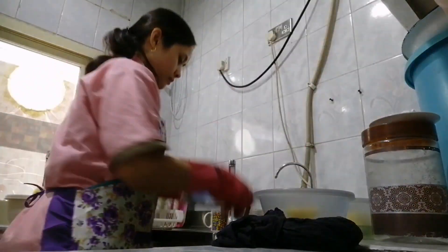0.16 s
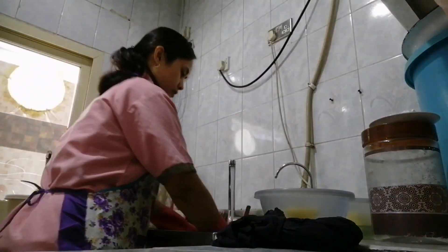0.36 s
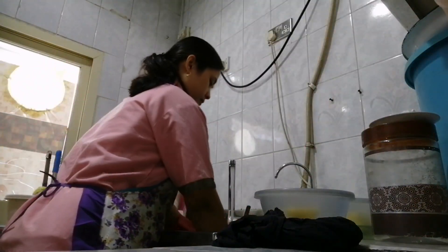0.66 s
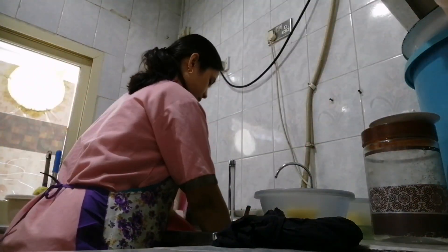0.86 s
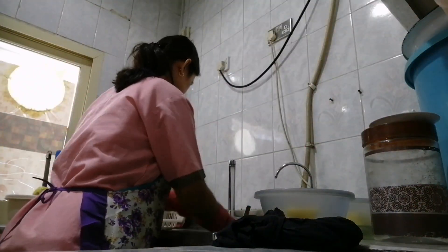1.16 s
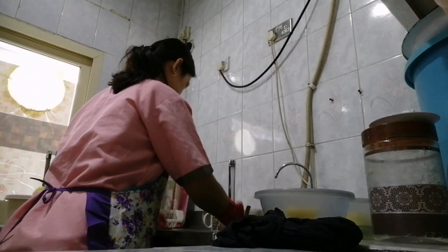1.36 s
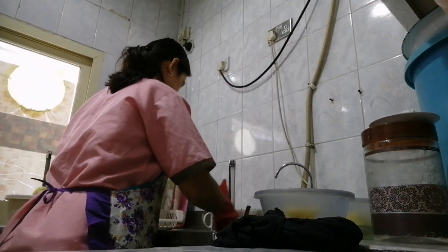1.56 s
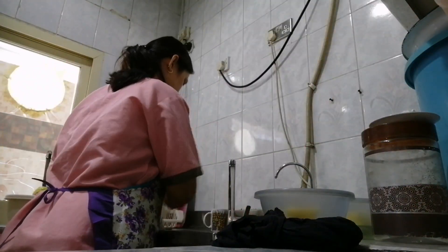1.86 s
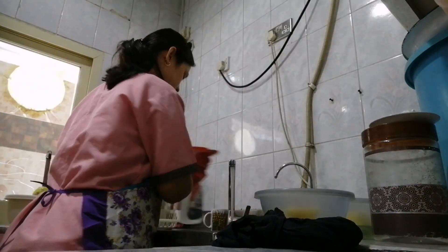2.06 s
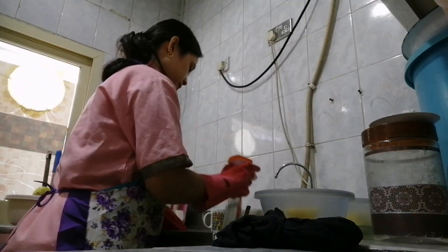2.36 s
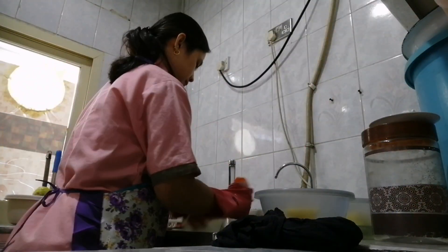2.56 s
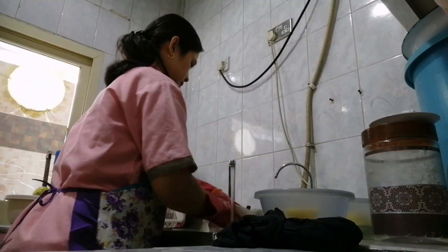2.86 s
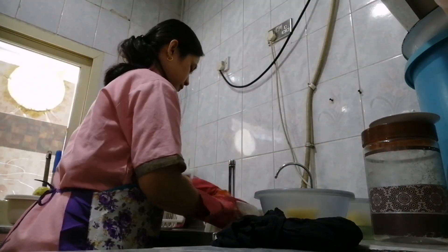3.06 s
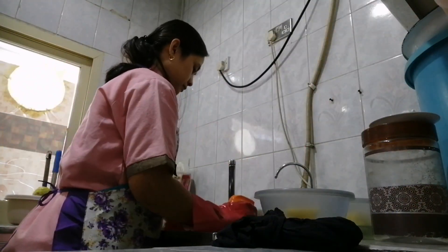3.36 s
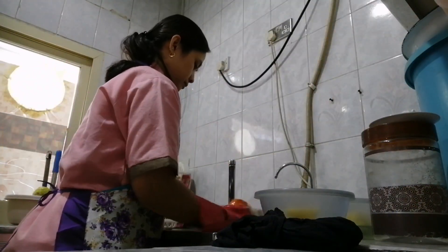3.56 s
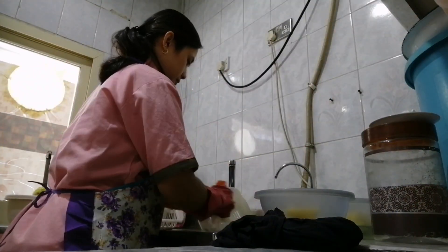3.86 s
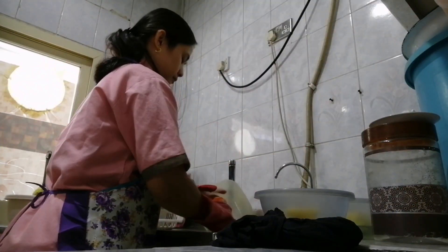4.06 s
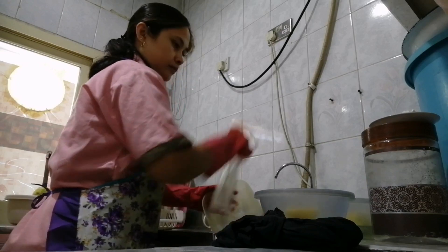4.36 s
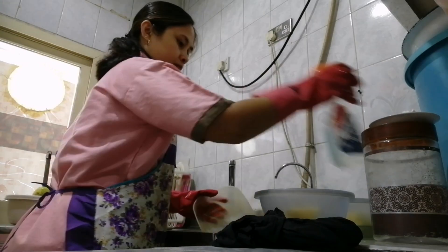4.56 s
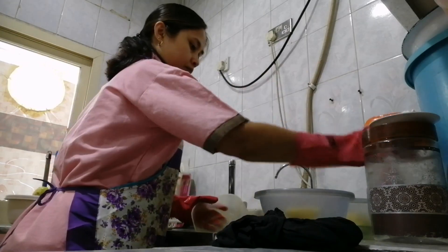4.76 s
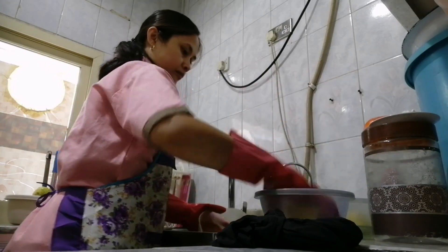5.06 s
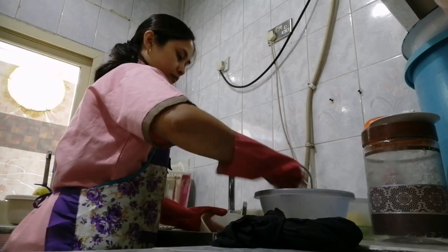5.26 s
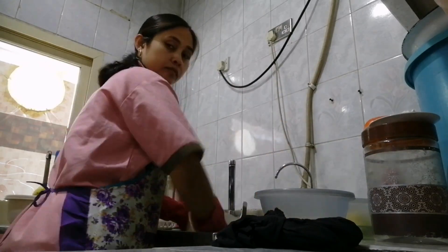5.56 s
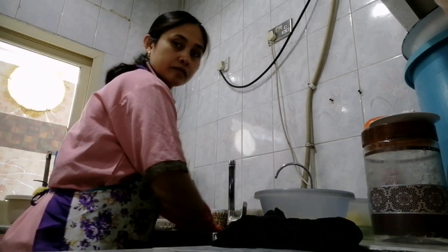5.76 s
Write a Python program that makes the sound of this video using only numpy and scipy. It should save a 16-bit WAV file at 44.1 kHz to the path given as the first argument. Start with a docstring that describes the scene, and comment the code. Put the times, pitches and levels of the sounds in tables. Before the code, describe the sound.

Plastic bowls knock hollowly in a steel sink while a scouring pad scrubs them with wet, hissing strokes.

```python
"""At a sink in a small tiled kitchen, plastic bowls are knocked about and scrubbed with a scouring pad.
Each impact excites damped modes: first those of the steel basin, then those of a bowl held in the hands,
hollow and short. The counter booms under the harder blows. Friction makes the pad hiss in strokes, with
squelching suds and fizzing foam; rim scrapes and drips give high pips, and the pad's tub bounces on a
jar lid. A phone with two microphone ports lies on the counter."""
import sys
import numpy as np
from scipy import signal
from scipy.fft import rfft, irfft, next_fast_len
from scipy.io import wavfile
from scipy.ndimage import uniform_filter1d

SR = 44100
rng = np.random.default_rng(int(sys.argv[2]) if len(sys.argv) > 2 else 0)


def output_pcm(signal):
    """Save a mono or channel-first signal as 16-bit PCM at the path in sys.argv[1].

    Samples are clipped to [-1, 1] before scaling.
    """
    pcm = np.clip(np.atleast_2d(signal).T, -1, 1) * 32767
    wavfile.write(sys.argv[1], SR, np.round(pcm).astype(np.int16))


N = 260628
LIFTED_S = 1.4  # the bowl leaves the basin


def amp(db):
    """Decibels to amplitude ratio."""
    return 10 ** (np.asarray(db) / 20)


def unit_rms(x):
    """Normalisation to unit power."""
    return x / np.sqrt(np.mean(x ** 2) + 1e-20)


def curve_at(points, hz):
    """Interpolation on a logarithmic frequency axis."""
    f, value = np.transpose(points)
    return np.interp(np.log(hz + 1), np.log(f + 1), value)


def add(mix, s, sound):
    """Superposition: a sound joins the mix at s seconds."""
    part = mix[:, round(s * SR):][:, :sound.shape[1]]
    part += sound[:, :part.shape[1]]


def bursts(rows):
    """Exponential decay: the envelope of sudden bursts (start, dB, T60), summed in power."""
    power, t = np.zeros((1, N)), np.arange(9000) / SR
    for s, db, t60 in rows:
        add(power, s, amp(db - 60 * t / np.clip(t60, .02, .3))[None] ** 2)
    return np.sqrt(power[0])


def movements(rows, level_db, release_s, rest_db):
    """Incoherent sources add in power: each swells, holds and fades. Swell and release span 20 dB."""
    t = np.arange(0, N, 64) / SR
    s, hold, swell = np.transpose(rows)[:3, :, None]
    drop = np.maximum(s - t, 0) / np.maximum(swell, .005) + np.maximum(t - s - hold, 0) / release_s
    power = (amp(level_db[:, None] - 20 * drop) ** 2).sum(0) + amp(rest_db) ** 2
    return np.interp(np.arange(N) / SR, t, np.sqrt(power))


def ring(modes, size, rise, near_hz=None, octaves=1.):
    """Modal impulse response: a sum of damped sinusoids, weakened away from near_hz if it is given."""
    hz, db, t60 = np.transpose(modes)[:, :, None]
    if near_hz:
        db = db - 9.1 * np.minimum((np.log2(hz / near_hz) / octaves) ** 2, 1.1)
    t = np.arange(size) / SR
    partials = amp(db - 60 * t / t60) * np.sin(2 * np.pi * (hz * t + rng.random(hz.shape)))
    return partials.sum(0) * (1 - np.exp(-t / rise))


def radiated(x):
    """Radiation efficiency: a small vessel gives off little bass."""
    return signal.sosfilt(signal.butter(2, 400, "high", fs=SR, output="sos"), x)


def impact(modes, blow, t60, rise, **pitch):
    """Convolution: a blow and its dying rebounds drive the modes; the peak is 1."""
    t = np.arange(6000) / SR
    force = rng.standard_normal(len(t)) * (rng.random(len(t)) < 1200 / SR) * amp(-60 * t / t60)
    force[0] += blow
    response = ring(modes, size=4000, rise=rise, **pitch)
    body = radiated(signal.fftconvolve(force, response)[:len(t)])
    return body / abs(body).max()


def taps(per_s, spread_db):
    """Poisson impulses of random sign and size: a train for each channel plus one common to both."""
    hit, size = rng.random((3, N)), rng.exponential(1, (3, N))
    sign = rng.choice([-1., 1.], (3, N))
    train = (hit < per_s / SR) * sign * amp(spread_db * np.minimum(size, 4))
    return train[:2] + train[2]


# Likeness of the two channels. Each row: frequency in Hz, correlation coefficient.
CORRELATION = [(60, 0.88), (180, 0.94), (550, 0.26), (1650, -0.29), (4970, 0.12), (15000, 0.04)]


def noise(colour, patchy_db, flicker_db, size=512):
    """Partly coherent stereo noise, modulated by spectral patches and a flicker common to all bands."""
    frames, hz = 4 * N // size + 5, np.fft.rfftfreq(size, 1 / SR)
    a, b, c, d, patches = rng.standard_normal((frames, len(hz), 5), np.float32).T
    patches = unit_rms(uniform_filter1d(uniform_filter1d(patches, size=6, axis=0), size=14, axis=1))
    flicker = unit_rms(uniform_filter1d(rng.standard_normal(frames), size=3))
    shared = np.clip(curve_at(CORRELATION, hz), -1, 1)[:, None]
    left = a + 1j * b
    right = shared * left + np.sqrt(1 - shared ** 2) * (c + 1j * d)
    gain = amp(curve_at(colour, hz)[:, None] + patchy_db * patches + flicker_db * flicker)
    sound = signal.istft(np.array([left, right]) * gain, nperseg=size, noverlap=3 * size // 4)[1]
    return unit_rms(sound[:, :N])


# The quiet kitchen. Each row: frequency in Hz, relative spectral density in dB.
AIR_SPECTRUM = [(18, -67), (30, 10), (64, -9), (108, -6), (208, -11.5), (231, -11.5), (370, -14.5),
                (444, -19), (577, -9.5), (1300, -19.5), (2130, -69), (4110, -101), (7110, -35),
                (13000, -72), (15600, -58)]


def room_air():
    """Ambient noise: a faint floor with most of its power at low frequencies."""
    return amp(-57.5) * noise(AIR_SPECTRUM, patchy_db=0.5, flicker_db=1.5, size=2048)


# The tiled room. Each row: frequency in Hz, time to decay by 60 dB (T60) in seconds.
ROOM_DECAY = [(100, 0.54), (500, 0.2), (2000, 0.24), (8000, 0.18)]


def tiled_walls(x):
    """Reverberation: sparse reflections of random sign, each band decaying at its own rate."""
    echoes = np.zeros((2, SR // 2))
    at = np.arange(150, SR // 2 - 20, 20) + rng.integers(0, 20, (2, (SR // 2 - 151) // 20))
    np.put_along_axis(echoes, at, rng.choice([-1., 1.], at.shape), 1)
    hz, t, spectra = signal.stft(echoes, SR, nperseg=256)
    tail = signal.istft(spectra * amp(-60 * t / curve_at(ROOM_DECAY, hz)[:, None]), SR, nperseg=256)[1]
    tail[:, :150] = 0
    return signal.fftconvolve(x, tail / np.linalg.norm(tail[0]), axes=1)[:, :N]


# Modes of the counter. Each row: frequency in Hz, level in dB, T60 in seconds.
COUNTER_MODES = [(94.5, -17, 0.054), (113, 2, 0.056), (172, -1.5, 0.045), (203, -10.5, 0.11),
                 (323, -2, 0.03)]


def counter_boom(near_hz):
    """Free vibration: the struck counter rings in its low modes; the peak is 1."""
    boom = ring(COUNTER_MODES, size=6000, rise=0.008, near_hz=near_hz, octaves=0.59)[None]
    return boom / abs(boom).max()


def counter_rumble():
    """Forced vibration: small taps of a moving dish keep the counter shaking."""
    force = taps(per_s=300, spread_db=2.5)[0]
    return unit_rms(signal.oaconvolve(force, ring(COUNTER_MODES, size=6000, rise=0.0014))[:N])


def sloshed(x, slosh_s=.07, bend=.04):
    """Frequency modulation: moving water shifts all the modes of a vessel up and down together."""
    n, turns = np.arange(N), np.arange(0, N, slosh_s * SR)
    drift = np.interp(n, turns, rng.standard_normal(len(turns)))
    warped = n + np.cumsum(bend * (drift - drift.mean()))
    return np.array([np.interp(warped % N, n, side) for side in x])


# A dish slides or rocks. Each row: time of full speed, hold and swell in seconds, level in dB,
# counter rumble in dB relative to that level.
SLIDE_EVENTS = [(0.05, 0.014, 0.27, -51.5, -1), (0.497, 0.013, 0.02, -20.5, -46),
                (0.617, 0.007, 0.019, -25, -11), (0.711, 0.11, 0.17, -29.5, -6.5),
                (0.912, 0.013, 0.082, -29.5, -9), (1.02, 0.015, 0.11, -26, -6),
                (1.03, 0.22, 0.23, -38.5, -2.6), (1.51, 0.072, 0.31, -48.5, -26),
                (1.587, 0.04, 0.094, -61, -19), (2.112, 0.022, 0.074, -48, -18),
                (2.347, 0.008, 0.09, -60, -3), (2.419, 0.0086, 0.0051, -42, -7),
                (2.495, 0.39, 0.05, -59, -2.5), (3.114, 0.015, 0.026, -57.5, 11.5),
                (3.213, 0.077, 0.3, -54, -9), (3.515, 0.034, 0.092, -50, -23),
                (3.6, 0.024, 0.036, -31.5, -9.5), (3.772, 0.064, 0.05, -66, -10),
                (4.113, 0.01, 0.1, -52, -6), (4.33, 0.017, 0.091, -53, -16), (4.53, 0.035, 0.041, -54, -5),
                (4.698, 0.04, 0.11, -73, 21.5), (4.897, 0.034, 0.014, -38, 6), (5.01, 0.14, 0.05, -78, 24),
                (5.192, 0.2, 0.11, -52.5, -7), (5.577, 0.012, 0.098, -41.5, -1),
                (5.645, 0.095, 0.046, -48, -17), (5.814, 0.082, 0.075, -46, -5.5)]


def sliding_dish(settle_s=0.098):
    """Random excitation: a moving dish taps vessel and counter. Gives shuffle, rumble and envelope."""
    level_db, rumble_db = np.transpose(SLIDE_EVENTS)[3:]
    sliding = movements(SLIDE_EVENTS, level_db, settle_s, rest_db=-67)
    force = taps(per_s=900, spread_db=3.5)
    basin, bowl = (unit_rms(signal.oaconvolve(force, ring(modes, size=4000, rise=0.0035)[None])[:, :N])
                   for modes in (BASIN_MODES, BOWL_MODES))
    vessel = np.where(np.arange(N) / SR < LIFTED_S, basin, bowl)
    rumble = movements(SLIDE_EVENTS, level_db + rumble_db, settle_s, rest_db=-58.5) * counter_rumble()
    return sliding * radiated(sloshed(vessel)), rumble, sliding


# Wet slaps and slips of dish or pad. Each row: start in seconds, hiss level in dB,
# squelch in dB relative to the hiss, nominal T60 in seconds.
SLAP_EVENTS = [(0.4778, -27.5, -11, 0.051), (0.597, -39.5, -11, 0.17), (0.7138, -29, 0.5, 0.2),
               (0.884, -41, -9, 0.33), (0.9413, -42, -4, 0.17), (1.052, -31.5, 5, 0.26),
               (1.1134, -29, -16, 0.18), (1.211, -23, -16, 0.12), (1.6497, -44.5, -19, 0.36),
               (1.7569, -42, -26, 0.3), (2.2736, -46.5, 0, 0.4), (3.49, -41.5, 8, 0.21),
               (3.521, -27, -22, 0.052), (3.675, -40.5, -3, 0.17), (3.883, -52.5, -1, 0.14),
               (3.9439, -52, 1, 0.3), (4.156, -51, -2, 0.17), (4.362, -50, -1.5, 0.24),
               (4.8856, -46.5, -5, 0.32), (5.5024, -55.5, 9, 0.1), (5.5598, -41.5, -15, 0.18)]


def wet_contacts():
    """Transients: wet surfaces meet in slaps and cracks. Gives the envelopes of hiss and of squelch."""
    hisses = [(s, db, t60) for s, db, _, t60 in SLAP_EVENTS]
    squelches = [(s, db + squelch_db, t60) for s, db, squelch_db, t60 in SLAP_EVENTS]
    squelches += [(s, db + crack_db, 0.14) for s, db, _, _, crack_db in KNOCK_EVENTS]
    squelches += [(s, db + crack_db, 0.04) for s, db, _, crack_db in TUB_BOUNCES]
    return bursts(hisses), bursts(squelches)


# Spectra of pad, water and foam. Each row: frequency in Hz, relative spectral density in dB.
HISS_SPECTRUM = [(2120, -10), (3600, -10), (4420, -11.5), (5160, -6.5), (5290, -4.5), (6280, -3),
                 (7010, 0.5), (10000, -13.5), (13000, -43), (22000, -120)]
SQUELCH_SPECTRUM = [(680, -10.5), (1150, -3), (1230, -9.5), (1360, -11), (1520, -6), (1750, -6),
                    (2690, -3.5), (4200, -13.5), (5460, -9), (9240, -120)]
FIZZ_SPECTRUM = [(5880, -24), (10000, 0.5), (12500, -3), (14900, -5), (15500, -12)]
# Strokes of the pad. Each row: time of full pressure, hold and swell in seconds, hiss level in dB,
# then squelch and fizz in dB relative to the hiss.
PAD_STROKES = [(0.0, 0.45, 0.05, -46.5, -4.5, -10.5), (0.505, 0.01, 0.078, -38, -13, -18),
               (0.623, 0.052, 0.093, -46, 2, -14), (0.731, 0.043, 0.04, -31, 0, -16.5),
               (0.951, 0.02, 0.052, -35.5, 4, -25), (1.018, 0.16, 0.043, -38, -2, -17),
               (1.122, 0.11, 0.032, -31.5, 3.5, -24), (1.268, 0.019, 0.062, -46.5, 1.5, -16),
               (1.367, 0.11, 0.11, -58.5, -17, -8), (1.598, 0.1, 0.26, -46, -4, -12.5),
               (1.79, 0.32, 0.093, -43, -14, -12), (2.147, 0.25, 0.07, -42.5, -18, -15.5),
               (2.429, 0.29, 0.081, -41.5, -9.5, -15.5), (2.84, 0.085, 0.053, -46.5, -4.5, -9),
               (3.008, 0.14, 0.24, -41.5, -31, -14.5), (3.25, 0.024, 0.16, -48.5, -1, -8),
               (3.325, 0.061, 0.092, -56, -1.5, -11), (3.522, 0.072, 0.077, -35.5, -6.5, -16),
               (3.623, 0.031, 0.074, -48, 1.5, -9), (3.771, 0.04, 0.035, -45, -8.5, -8.5),
               (3.997, 0.024, 0.066, -44.5, -9, -9), (4.19, 0.043, 0.042, -46.5, -4, -9.5),
               (4.393, 0.026, 0.044, -41.5, -6, -11), (4.538, 0.052, 0.036, -55, 3, -25),
               (4.913, 0.017, 0.02, -57.5, -12, -21), (5.245, 0.028, 0.14, -62.5, 5, -9),
               (5.315, 0.067, 0.063, -53.5, -4.5, -9.5), (5.488, 0.074, 0.04, -61.5, 5.5, -20),
               (5.615, 0.025, 0.071, -49, -19, -4), (5.702, 0.026, 0.092, -49, -1, -18),
               (5.786, 0.037, 0.12, -54, 3, -16)]


def scrubbing(sliding, lift_s=0.09, suds_hz=2130):
    """Friction noise: pad hiss, water squelch and foam fizz follow the strokes, slaps and slides."""
    hiss_db, squelch_db, fizz_db = np.transpose(PAD_STROKES)[3:]
    slap, splash = wet_contacts()
    hiss_gain = np.hypot(movements(PAD_STROKES, hiss_db, lift_s, rest_db=-74), slap)
    fizz_gain = np.hypot(movements(PAD_STROKES, hiss_db + fizz_db, lift_s, rest_db=-83), amp(-16.5) * slap)
    pad_wet = movements(PAD_STROKES, hiss_db + squelch_db, lift_s, rest_db=-70)
    dish_wet = np.hypot(amp(-13) * sliding, splash)
    hiss = hiss_gain * noise(HISS_SPECTRUM, patchy_db=2.0, flicker_db=1.4)
    water = noise(SQUELCH_SPECTRUM, patchy_db=2.4, flicker_db=1.1)
    lows = 0.55 * signal.sosfiltfilt(signal.butter(4, suds_hz, fs=SR, output="sos"), water)
    suds = water - lows  # suds under the pad squelch higher
    squelch = np.hypot(dish_wet, pad_wet) * suds + dish_wet * lows
    fizz = fizz_gain * noise(FIZZ_SPECTRUM, patchy_db=2.0, flicker_db=1.4)
    return hiss + squelch + fizz


# Short, high pips: rim scrapes and small drips. Each row: start in seconds, level in dB, pitch in Hz.
SCRAPES_AND_DRIPS = [(0.048, -33.5, 1640), (1.6717, -34, 3240), (2.761, -51, 1620), (2.986, -50, 1610),
                     (3.0964, -40, 1920), (4.112, -44.5, 3380)]


def scrapes_and_drips():
    """Heavy damping: two close modes die quickly, giving a short, high pip."""
    pips = np.zeros((2, N))
    for s, db, hz in SCRAPES_AND_DRIPS:
        modes = [(hz, 0, .006), (.87 * hz, -3, .006)]
        add(pips, s, amp(db) * impact(modes, blow=.5, t60=.09, rise=.003)[None])
    return pips


# Left-right balance of the knocks over time. Each row: time in seconds, left minus right level in dB.
KNOCK_BALANCE = [(0, -11), (0.5, -5.5), (0.74, 14), (0.95, -4), (1.14, -6), (1.6, -4), (2.5, -4),
                 (3.3, -6.5), (3.64, -3), (4.2, -5), (4.9, -4.5), (5.3, -14), (5.6, -14), (5.91, -20)]


def balance(s):
    """Level difference between channels: left and right gains for a blow at s seconds."""
    return amp(np.interp(s, *np.transpose(KNOCK_BALANCE)) * np.array([[.5], [-.5]]))


# Modes of the jar lid. Each row: frequency in Hz, level in dB, T60 in seconds.
LID_MODES = [(320, -13, 0.048), (486, -2, 0.048), (622, 0, 0.029), (702, -6.5, 0.039), (836, -8, 0.03),
             (1103, -11, 0.027), (1950, -20, 0.016), (2510, -16, 0.015), (3070, -24, 0.017)]
# The pad's tub lands on the lid. Each row: start in seconds, level in dB,
# then counter boom and crack in dB relative to that level.
TUB_BOUNCES = [(4.887, -12.5, -14, -23.5), (4.904, -23, -16, -24), (4.924, -21, -16, -30),
               (4.944, -30.5, -10, -24)]


def bouncing_tub(deep_boom):
    """Rebound: each landing of the tub excites the lid and the counter beneath it."""
    thuds, booms = np.zeros((2, 2, N))
    for s, db, boom_db, _ in TUB_BOUNCES:
        add(thuds, s, amp(db) * balance(s) * impact(LID_MODES, blow=4.7, t60=0.056, rise=0.004))
        add(booms, s, amp(db + boom_db) * deep_boom)
    return thuds, booms


# Modes of the steel basin with dishes in it, and of the hand-held bowl.
# Each row: frequency in Hz, level in dB, T60 in seconds.
BASIN_MODES = [(456.2, -1.5, 0.052), (693, 1, 0.028), (797.5, 2, 0.034), (862.6, 1, 0.04),
               (1082, -14, 0.053), (1457, -5.5, 0.02), (2100, -16, 0.029), (2516, -20, 0.03),
               (2910, -17, 0.021)]
BOWL_MODES = [(498, 0.5, 0.025), (600.6, 4.5, 0.021), (710, 9, 0.018), (800, -7.5, 0.033),
              (879, -0.5, 0.027), (1039, 0.5, 0.023), (1618, -8, 0.024), (1940, -3.5, 0.015)]
# Knocks of the bowls. Each row: start in seconds, level in dB, pitch in Hz,
# then counter boom and crack in dB relative to that level.
KNOCK_EVENTS = [(0.048, -35, 990, -29, -9.5), (0.268, -43, 810, -1.5, -0.5), (0.472, -17, 887, -46, -15),
                (0.482, -15, 865, -38, -25), (0.502, -15, 902, -22, -18), (0.555, -17, 477, -49, -25),
                (0.566, -9.5, 469, -23, -35), (0.613, -12.5, 496, -38, -21), (0.634, -22, 805, -25, -34),
                (0.729, -14, 453, -46, -25), (0.754, -24, 905, -13, -14), (0.883, -11, 687, -38, -25.5),
                (0.919, -29, 930, -33, -22), (0.965, -11.5, 764, -35, -13.5), (0.981, -11, 828, -28, -17.5),
                (1.039, -15, 630, -36, -18), (1.054, -13.5, 825, -27, -19), (1.114, -15, 817, -14, -15),
                (1.139, -21, 884, -20, -0.5), (1.168, -12.5, 757, -35, -8), (1.571, -31, 774, -58, -17),
                (1.594, -31.5, 956, -22, -16), (1.785, -34, 905, -37, -17), (2.109, -43, 610, -9, -0.5),
                (2.285, -34, 643, -21, -13), (2.329, -27.5, 750, -25, -9.5), (2.418, -28.5, 487, -20, -10),
                (2.445, -31, 540, -3.5, -13), (2.57, -31, 652, -24, -13.5), (2.771, -32.5, 670, -29, -17.5),
                (2.822, -36.5, 720, -26, -22), (2.938, -31, 640, -37, -25), (3.083, -28, 642, -3, -18),
                (3.099, -26, 705, -7.5, -15.5), (3.18, -38, 716, -9, -23), (3.214, -35.5, 700, -12, -31),
                (3.243, -29.5, 774, -40, -21), (3.272, -42.5, 900, -32, -23), (3.324, -38, 660, -10, -15),
                (3.446, -39, 630, -15, -13), (3.49, -25, 835, -33, -18), (3.579, -19.5, 513, -42, -14.5),
                (3.624, -24.5, 604, -19, -30), (3.659, -24.5, 570, -39, -18), (3.767, -36, 620, -30, -31),
                (3.797, -40, 680, -30, -31), (3.825, -45, 685, -30, -29), (3.905, -31, 677, -39, -28),
                (3.954, -38, 665, -32, -19), (4.164, -37, 1080, -4.5, -10), (4.518, -38, 1080, -17, -31),
                (4.544, -31, 1068, -27, -27), (4.59, -38, 1090, -27, -16), (5.175, -40.5, 905, -26, -17),
                (5.229, -38.5, 816, -12, -19), (5.299, -34, 764, -39, -14), (5.546, -31, 1013, -25, -32),
                (5.569, -26.5, 725, -3, -29), (5.589, -28, 760, -16, -23), (5.65, -36.5, 740, -7, -18),
                (5.704, -37, 618, -8, -5.5), (5.811, -34.5, 813, -16, -11)]


def knocking_bowls(deep_boom, light_boom):
    """Resonance: the vessel rings most near the struck dish's pitch; light touches rattle longer."""
    knocks, booms = np.zeros((2, 2, N))
    for s, db, pitch_hz, boom_db, _ in KNOCK_EVENTS:
        hardness = np.clip((db + 54) / 30, 0, 1)
        vessel = BASIN_MODES if s < LIFTED_S else BOWL_MODES
        modes = np.array(vessel + [(pitch_hz, 1.5, 0.02 + 0.028 * hardness)])
        # every blow lands elsewhere, wetter or drier: the vessel's modes scatter in pitch and level
        detune, uneven = rng.standard_normal((2, 16))[:, 1:len(modes)]
        modes[:-1, 0] *= 1 + 0.028 * detune
        modes[:-1, 1] += 2 * uneven
        body = impact(modes, blow=1.38 + 2.46 * hardness, t60=.17 - 0.032 * hardness,
                      rise=.007 - 0.0048 * hardness, near_hz=pitch_hz, octaves=0.54)
        add(knocks, s, amp(db - 4.5) * balance(s) * body)
        boom = deep_boom if db > -20.5 else light_boom  # hard blows favour the lowest modes
        add(booms, s, amp(db + boom_db) * boom)
    return knocks, booms


def scene():
    """Superposition: the direct sounds, the reverberation of dishes and booms, and the room's air."""
    deep_boom, light_boom = counter_boom(near_hz=135), counter_boom(near_hz=210)
    knocks, knock_booms = knocking_bowls(deep_boom, light_boom)
    pips = scrapes_and_drips()
    thuds, tub_booms = bouncing_tub(deep_boom)
    shuffle, rumble, sliding = sliding_dish()
    dishes = knocks + pips + thuds + shuffle
    booms = knock_booms + tub_booms
    direct = dishes + booms + rumble + scrubbing(sliding) + room_air()
    return direct + amp(-7) * tiled_walls(dishes + amp(-4.5) * booms)


# Colouring of the two microphone ports. Each row: frequency in Hz, left minus right level in dB.
PORT_BALANCE = [(60, -17), (110, -4), (200, -9), (380, 1), (700, -6), (1290, 2), (2380, -0.5), (4400, -2.5),
                (8120, -1.0), (15000, 0.0)]
PORT_HZ, PORT_WIDTH_HZ, PORT_PEAK_DB = 7230, 600, 2
LOW_CUT_HZ, HIGH_CUT_HZ = 50, 15741


def record(dry):
    """Each port has its own colour and a treble resonance; deep bass and top treble are then cut off."""
    size = next_fast_len(N + SR)
    hz = np.fft.rfftfreq(size, 1 / SR)
    balance_db = curve_at(PORT_BALANCE, np.maximum(hz, 100)) * np.array([[.5], [-.5]])
    resonance_db = PORT_PEAK_DB / (1 + (2 * (hz - PORT_HZ) / PORT_WIDTH_HZ) ** 2)
    ported = irfft(rfft(dry, size) * amp(balance_db + resonance_db), size)[:, :N]
    ported = signal.sosfilt(signal.butter(2, LOW_CUT_HZ, "high", fs=SR, output="sos"), ported)
    low_pass = signal.firwin(2047, HIGH_CUT_HZ, window=("kaiser", 9), fs=SR)
    return signal.oaconvolve(ported, low_pass[None], "same")


dry = scene()
out = record(dry)
output_pcm(out)
```